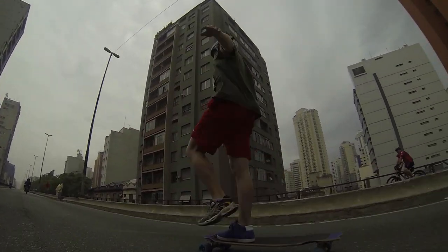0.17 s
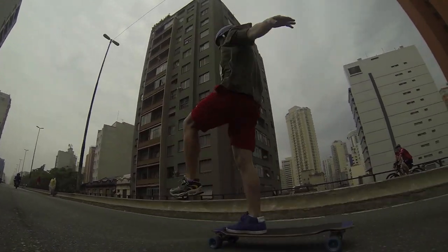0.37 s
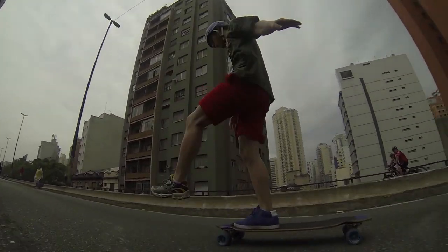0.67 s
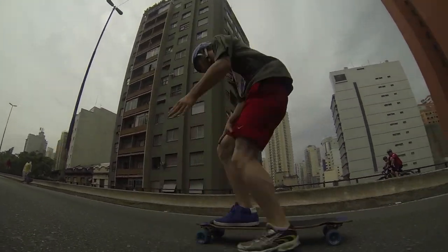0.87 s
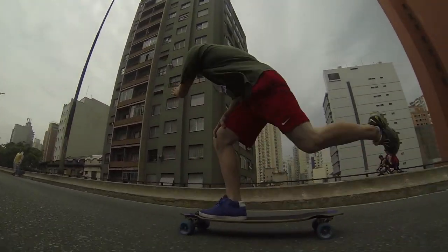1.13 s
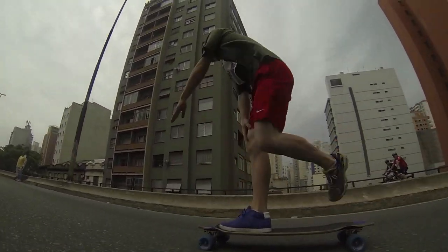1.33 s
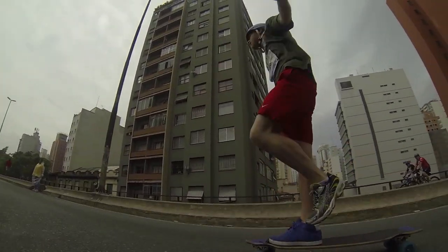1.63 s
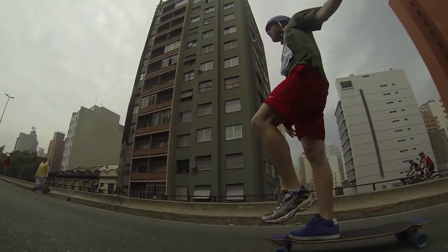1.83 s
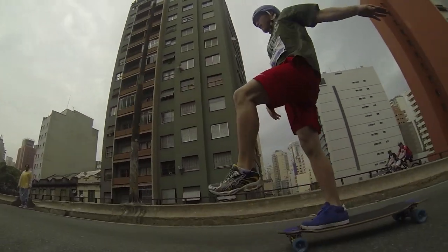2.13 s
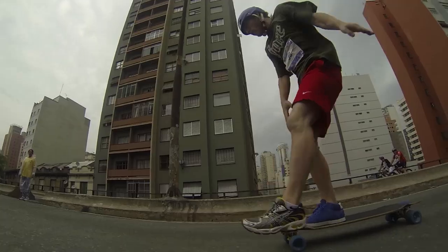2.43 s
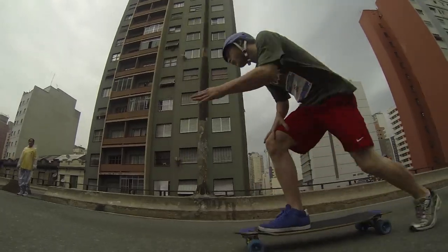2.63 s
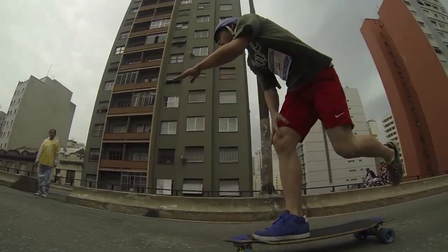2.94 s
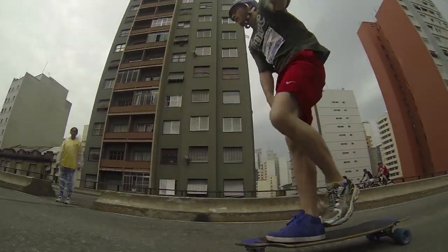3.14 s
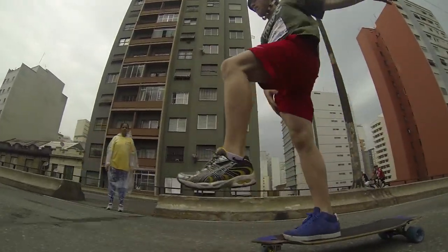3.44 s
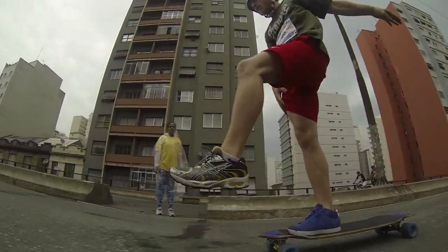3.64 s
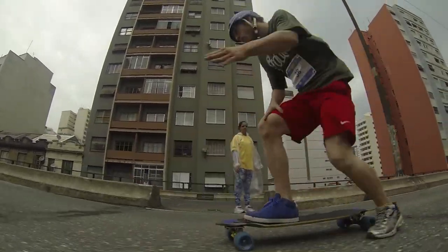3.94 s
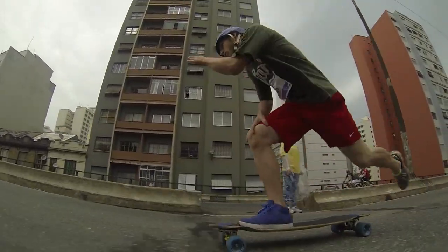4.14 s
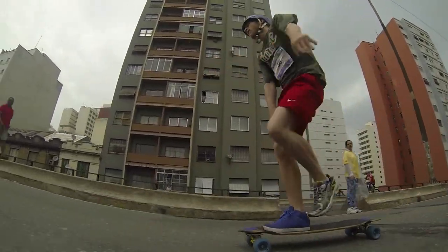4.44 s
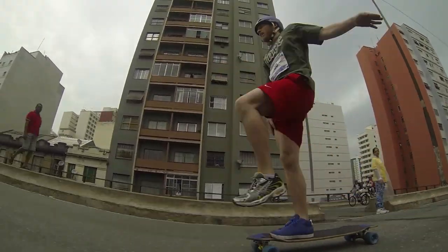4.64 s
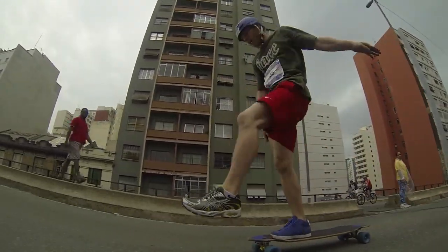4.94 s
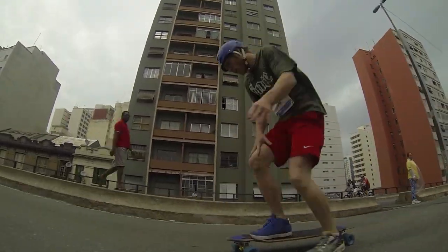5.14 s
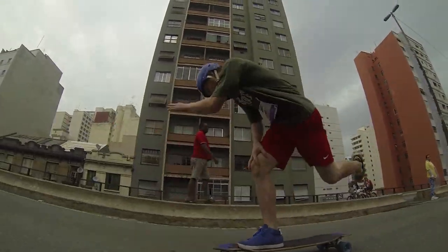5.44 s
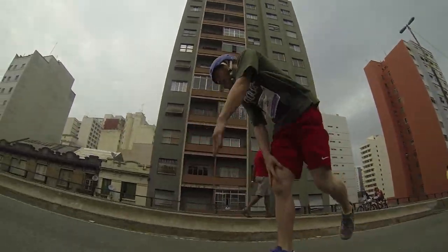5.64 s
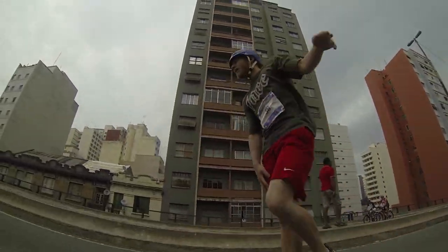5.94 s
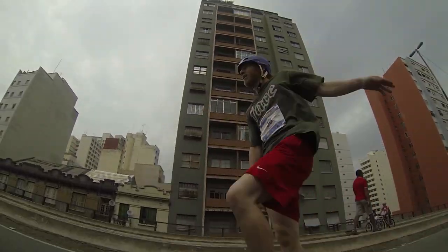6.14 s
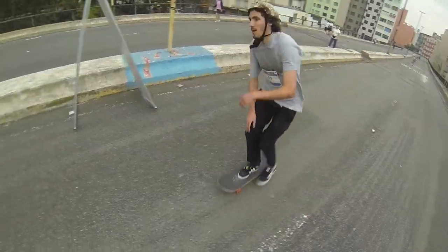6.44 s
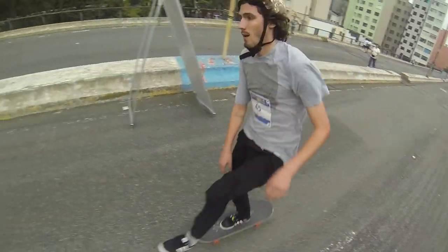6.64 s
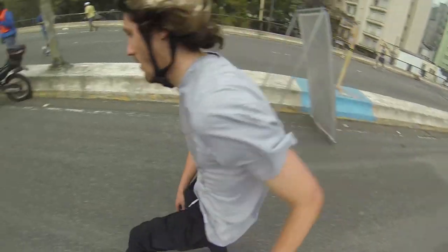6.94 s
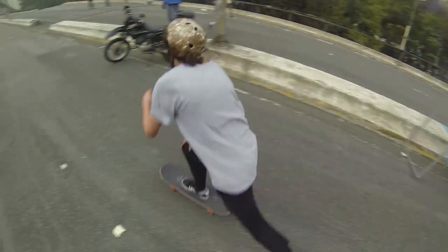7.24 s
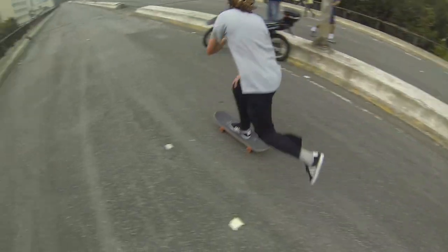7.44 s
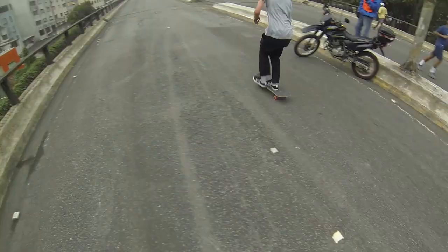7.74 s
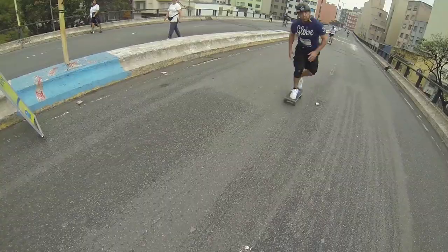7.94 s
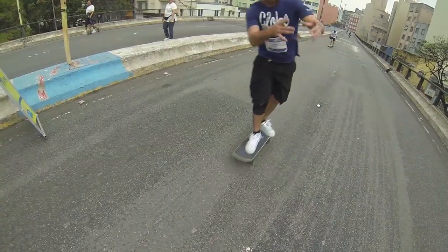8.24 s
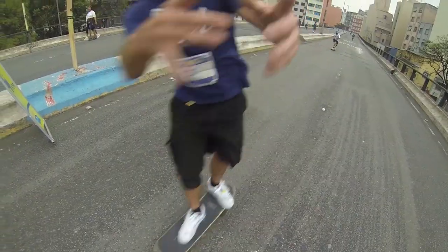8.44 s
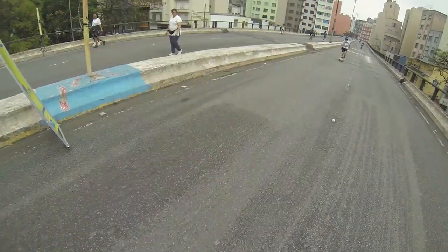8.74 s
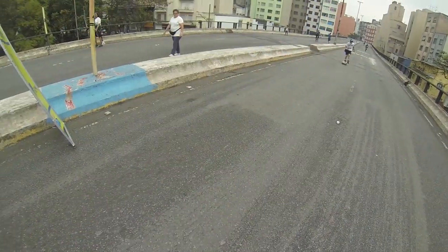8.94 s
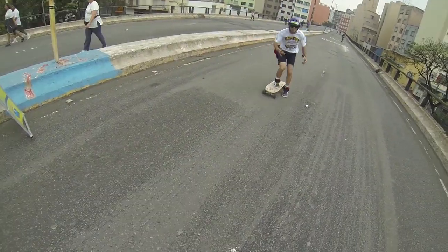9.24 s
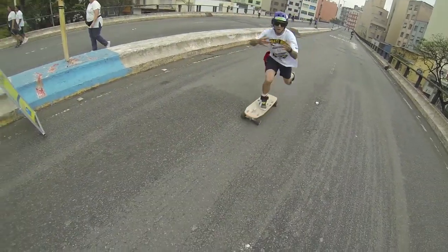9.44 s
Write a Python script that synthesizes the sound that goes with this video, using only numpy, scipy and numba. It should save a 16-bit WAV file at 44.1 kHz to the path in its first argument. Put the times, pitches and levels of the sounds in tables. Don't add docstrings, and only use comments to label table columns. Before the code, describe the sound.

A longboard rumbles over coarse asphalt with heavy low wind thumps and pole shake, then other boards clatter past a roadside microphone in fluttering gusts.

```python
import sys
import numpy as np
from scipy import signal
from scipy.fft import rfft, irfft
from scipy.io import wavfile
from scipy.ndimage import uniform_filter1d
from numba import njit

SR = 44100
rng = np.random.default_rng(int(sys.argv[2]) if len(sys.argv) > 2 else 0)


def file_out(sig):
    cols = np.atleast_2d(sig).T
    lim = np.clip(cols, -1, 1)
    pcm = np.round(lim * 32767).astype(np.int16)
    wavfile.write(sys.argv[1], SR, pcm)


def volts_from_decibels(level):
    exponent = np.asarray(level, float) / 20
    return 10 ** exponent


N = 423345
TIME = np.arange(N) / SR
STOP_S = 6.52

# (time [s], level [dB])
WIND_THUMPS = [(0.0, -21), (0.16, -14), (0.21, -23), (0.29, -15.5), (1.55, -20), (1.95, -15.5),
               (2.75, -15.5), (2.83, -24), (3.2, -21), (3.69, -21), (4.0, -21), (4.3, -21.5), (4.8, -20),
               (5.03, -17.5), (6.3, -16.5), (6.6, -21.5), (6.8, -16.5), (7.0, -24.5), (7.12, -14.5),
               (7.25, -23.5), (7.46, -17.5), (7.55, -18), (7.7, -19.5), (7.82, -25.5), (7.94, -23),
               (7.97, -17), (8.08, -27), (8.21, -18.5), (8.26, -28), (8.34, -20), (8.4, -26), (8.46, -25),
               (8.55, -29), (8.7, -25), (8.81, -24), (8.9, -27), (9.05, -26.5), (9.19, -24), (9.28, -27),
               (9.36, -27.5), (9.45, -26.5), (9.52, -25.5), (9.6, -18)]
# (frequency [Hz], level [dB per Hz])
RIDING_GUST = [(12, -10.5), (22, -3), (38, -6), (50, -11), (62, -12), (85, -10), (130, -26.5), (160, -36),
               (260, -45.5), (500, -74), (2000, -110)]
# (frequency [Hz], level [dB per Hz])
STILL_GUST = [(12, 1), (20, 3.5), (30, -4), (52, -8), (65, -18), (90, -16), (130, -37), (260, -46.5),
              (500, -64), (2000, -110)]
# (time [s], peak level [dB])
MOUNT_BUZZES = [(0.09, -39.5), (0.3, -40.5), (0.65, -34), (1.04, -38.5), (1.3, -42), (1.65, -41),
                (1.84, -38.5), (2.13, -46), (2.55, -32), (2.35, -36.5), (2.75, -44), (3.1, -50), (3.5, -40),
                (3.75, -41.5), (4.05, -42), (4.33, -39.5), (4.55, -40), (4.85, -41.5), (5.05, -38),
                (5.3, -40), (5.5, -37), (5.75, -38.5), (5.95, -38), (6.24, -38.5), (6.56, -46), (6.82, -46),
                (6.98, -45), (7.15, -46.5), (7.45, -47), (7.7, -44.5), (8.1, -47), (8.73, -51.5),
                (9.55, -50)]
BUZZ_RISE_DB_S, BUZZ_FALL_DB_S, BUZZ_REST_DB = 114, 73.5, -35

# (time [s], pitch [Hz], level [dB])
SWAY = [(0.04, 54.05, -20.5), (0.36, 52.97, -20.5), (0.58, 62.64, -18), (1.17, 66.86, -15),
        (2.15, 66.55, -18.5), (2.33, 60.4, -18), (2.48, 67.04, -23.5), (2.74, 62.05, -14.5),
        (3.03, 72.18, -16), (3.6, 69.9, -15.5), (4.1, 75.68, -22), (4.2, 80.6, -17.5), (4.32, 71.14, -21.5),
        (4.68, 68.76, -13.5), (4.8, 77.4, -19), (4.95, 65.7, -16), (5.15, 59.9, -17.5), (5.32, 66, -19),
        (5.45, 76.14, -17.5), (5.58, 65.57, -20.5), (5.95, 62.06, -21), (6.3, 68, -21), (6.6, 54, -25.5),
        (7.67, 54.04, -22), (8.0, 52.4, -32.5)]
# (time [s], depth [dB])
CHOKES = [(0.12, 19), (0.42, 9.5), (0.64, 13.5), (0.77, 7), (1.001, 11.5), (1.38, 6), (1.62, 6), (1.8, 5),
          (2.0, 0), (2.681, 12), (2.98, 6.5), (2.23, 15.5), (3.478, 13.5), (3.74, 15.5), (3.86, 10.5),
          (4.22, 4), (5.6, 11.5), (5.8, 6), (6.15, 13.5), (4.58, 10), (5.03, 13.5), (5.23, 1.5), (6.54, 5),
          (6.71, 8), (6.92, 3.5), (7.12, -6), (7.31, 5), (7.5, 7), (7.86, 7)]
CHOKE_DB_S, LET_GO_DB_S = 155.5, 123
# (time [s], pitch [Hz], peak level [dB])
FLEX_BUMPS = [(0.07, 98.6, -28), (0.22, 101, -24.5), (0.34, 97.5, -39), (0.5, 105, -37), (0.57, 105.4, -28),
              (0.75, 103.3, -29), (1.0, 96.8, -28), (1.15, 100.2, -30), (1.3, 108.8, -31),
              (1.418, 100.6, -20.5), (1.65, 105.2, -21.5), (1.87, 118.8, -25), (2.139, 88.6, -27.5),
              (2.309, 115.7, -25), (2.531, 108.4, -20), (2.66, 95.4, -26), (2.77, 101, -22.5),
              (2.98, 110.2, -25.5), (3.15, 108.2, -23.5), (3.3, 107.6, -27.5), (3.638, 104, -20),
              (3.902, 103.5, -18.5), (4.05, 111.3, -16.5), (4.22, 111, -22), (4.498, 105.6, -24.5),
              (4.81, 98.6, -20), (5.18, 100.8, -19), (5.339, 104.7, -20.5), (5.629, 99.3, -17),
              (5.941, 94.8, -28.5), (6.29, 102.9, -23), (6.68, 99.7, -34), (7.3, 100, -37),
              (7.45, 97.9, -34), (7.69, 107.5, -33), (8.0, 94.9, -34), (9.05, 99.7, -43.5),
              (9.44, 102.4, -32)]
FLEX_RISE_DB_S, FLEX_FALL_DB_S, FLEX_REST_DB = 113.5, 95, -16.5

# (time [s], roll level [dB])
NEAR_ROLL = [(0.04, -39), (0.3, -39.5), (0.58, -39.5), (0.75, -41.5), (1.05, -39.5), (1.43, -40),
             (1.85, -36), (2.23, -40.5), (2.74, -41.5), (3.53, -42.5), (3.89, -42), (4.3, -45),
             (4.67, -41.5), (5.0, -43), (5.24, -43), (5.5, -42.5), (6.05, -42.5), (6.25, -45.5)]
# (time [s], depth [dB], pull time [s])
DUCKS = [(0.34, 4, 0.023), (0.611, 7, 0.013), (0.9, 8.5, 0.11), (1.01, 5.5, 0.057), (1.25, 8, 0.38),
         (1.52, 9.5, 0.063), (1.75, 10.5, 0.26), (1.87, 15.5, 0.0063), (2.45, 6, 0.26), (2.63, 8.5, 0.19),
         (2.83, 11, 0.099), (2.93, 7.5, .1), (3.09, 5, 0.079), (3.2, 7.5, 0.067), (3.38, 4.5, 0.075),
         (3.7, 4, 0.08), (3.94, 7, 0.027), (4.56, 2.5, 0.24), (4.69, 7, 0.016), (4.82, 4.5, 0.3),
         (4.875, 3.5, .02), (5.19, 2, 0.1), (5.32, 5, 0.03), (5.7, 1, .1), (6.08, 1, 0.034),
         (6.41, 7.5, 0.19), (6.5, 8, 0.033)]
RECOVER_DB_S = 48
GRIT_UNDER_DB, DRUM_DB, DRUM_SHARE = -5, -47.5, 0.48
COMING_DB, COMING_DB_S = -43.5, 11.5
# (time [s], roll [dB], deck drum [dB], deck ring [Hz])
PASSING_BOARDS = [(6.53, -46, -46, 463), (6.6, -51, -38, 474), (6.7, -50, -39.5, 515), (6.8, -61, -41, 514),
                  (6.9, -56, -40.5, 570), (7.03, -55, -48, 606), (7.12, -48, -41.5, 564),
                  (7.22, -43, -39.5, 560), (7.3, -55, -42, 578), (7.7, -52, -49.5, 656),
                  (8.13, -47, -52, 760), (8.3, -49, -54.5, 585), (8.42, -46, -46, 537),
                  (8.5, -43.5, -41.5, 643), (8.57, -47.5, -41.5, 600), (8.64, -46, -41.5, 620),
                  (8.72, -50, -49, 333), (8.8, -49.5, -58, 420), (9.03, -51, -56, 470),
                  (9.41, -45.5, -67, 504), (9.55, -49, -51.5, 624)]
COME_DB_S, GO_DB_S, STREET_ROLL_DB, STREET_DRUM_DB = 61, 69, -53.5, -76
# (time [s], level [dB])
FAR_GRIT = [(6.53, -55.5), (6.58, -60), (6.62, -65), (6.7, -66), (6.9, -71), (7.05, -65), (7.22, -60),
            (7.35, -69), (7.75, -59), (7.98, -64), (8.14, -58), (8.25, -65), (8.55, -63), (8.62, -66),
            (8.69, -58.5), (8.86, -64), (9.2, -82.5), (9.36, -62), (9.49, -61), (9.6, -61)]
# (frequency [Hz], width [Hz], level [dB])
CASE_LOW = [(1466, 283, 2), (1432, 54, 0.5), (1818, 115, -4.5), (1662, 110, -3.5), (1335, 380, -7.5)]
# (frequency [Hz], width [Hz], level [dB])
CASE_HIGH = [(2262, 460, 3), (3146, 640, 2), (4020, 910, -5.5), (4610, 140, -10.5), (4970, 180, -12.5),
             (5255, 1020, -8), (6665, 740, -12), (7620, 1100, -21), (9400, 1900, -23), (11100, 2600, -31)]
# (frequency [Hz], width [Hz], level [dB])
CASE_THIN = [(2290, 31, -2.5), (3130, 39, -1), (3960, 70, -1), (4720, 59, -1.5), (6740, 63, -7.5)]
# (frequency [Hz], width [Hz], level [dB])
FAR_LOW = [(1485, 240, 3.5), (1320, 220, -2.5), (1840, 290, -11), (1040, 350, -16)]
# (frequency [Hz], width [Hz], level [dB])
FAR_HIGH = [(2220, 500, 6.5), (2520, 160, 4), (3140, 700, 0.5), (3850, 350, -8), (4700, 360, -14)]
# (frequency [Hz], width [Hz], level [dB])
DECK = [(289, 277, 3.5), (459, 71, 0), (704, 340, -6.5), (803, 620, -7.5)]
BIGGEST_STONE = 3

# (frequency [Hz], level [dB per Hz])
HISS = [(200, 1), (1500, -13), (3000, -16.5), (4400, -24.5), (7000, -25.5), (8100, -34), (10300, -30),
        (12000, -37.5), (13000, -44.5), (15000, -46.5)]
# (frequency [Hz], width [Hz], level [dB])
HISS_PEAKS = [(5110, 360, -16), (8830, 840, -25.5), (9740, 280, -27)]
# (frequency [Hz], width [Hz], level [dB])
WHINES = [(9350, 14, -22), (9411, 14, -21), (9830, 12, -22)]

# (time [s], case ring [dB], sharp crack [dB], deck [dB], deck pitch [Hz])
KNOCKS = [(0.435, -50, -66, -40, 340), (0.555, -50, -66, -39, 358), (0.6145, -48, -66, -32.5, 327),
          (0.619, -52, -66, -38.5, 480), (0.628, -52, -57, -43, 366), (2.4159, -47, -55, -48, 333),
          (6.5693, -33.5, -60, -25.5, 490), (6.586, -42, -70, -33, 486), (6.6077, -49, -71, -30.5, 467),
          (6.652, -40, -68, -30, 480), (6.662, -45, -72, -40, 800), (6.691, -60, -68, -36, 543),
          (6.708, -53, -72, -45, 484), (6.749, -38, -65.5, -36, 525), (6.778, -42, -66, -36, 510),
          (6.794, -48, -70, -45, 480), (6.8144, -19, -55, -24.5, 469.3), (6.826, -50, -70, -32, 444),
          (6.876, -52, -70, -35, 554), (6.908, -47, -68, -43, 608.7), (7.035, -35, -64, -46, 644),
          (7.055, -46, -66, -40, 640), (7.231, -47, -71, -45, 448), (7.259, -47, -65, -41, 520),
          (7.0971, -32, -58, -47, 297.8), (7.117, -40, -57, -43, 302), (8.335, -35, -61, -44, 814),
          (8.403, -37, -62, -40, 506), (8.4508, -30, -66, -39, 337), (8.5058, -29, -61, -41, 442),
          (8.5764, -25, -62, -37, 425), (8.587, -27, -69, -42, 650), (8.656, -45.5, -62, -44, 621),
          (8.689, -45, -64, -58, 495), (8.706, -49, -60, -52, 518), (9.0164, -53, -63, -46, 347)]
# (time [s], case ring [dB], sharp
# crack [dB])
TICKS = [(0.938, -42, -47.5), (4.672, -36, -49), (4.851, -43, -54.5), (5.234, -31, -49.5),
         (6.8165, -27, -50.5), (7.462, -44, -62), (7.487, -45, -64), (8.322, -49, -62), (7.3867, -39, -55),
         (7.771, -33, -66), (7.8152, -37, -66), (7.837, -30, -68), (7.952, -40, -70), (8.05, -33, -64),
         (8.0907, -34, -69), (8.1324, -40, -60), (8.177, -34, -72), (8.2, -37, -69), (8.288, -42, -67.5),
         (9.075, -31, -70), (9.1686, -51, -72), (9.291, -53, -74), (9.3671, -36, -68)]
TICK_DECK_DB, TICK_DECK_HZ = -50.5, 320
MOUNT_KNEE_DB, MOUNT_SLOPE = -24.5, 1.5
# (frequency [Hz], width [Hz], level [dB])
CRACK = [(2230, 500, 0.5), (3250, 840, 0), (4050, 530, -3.5), (4900, 590, -6.5), (6300, 1000, -13),
         (7840, 1200, -17.5)]
# (time [s], pole level [dB], mount level [dB])
THUMPS = [
    (6.8131, -18, -22),
    (8.728, -30.5, -45),
    (8.781, -44, -49),
]

# (time [s], peak level [dB])
JOLTS = [(0.591, -41), (1.116, -30.5), (1.25, -32.5), (1.44, -30), (1.633, -37.5), (1.761, -38),
         (1.839, -28.5), (2.12, -32.5), (2.225, -33), (2.5, -32), (2.6, -43), (2.729, -30), (3.03, -27),
         (3.317, -33.5), (3.504, -40), (3.665, -36), (4.12, -35), (4.26, -39.5), (4.615, -35), (4.822, -41),
         (4.961, -42), (5.168, -39), (5.686, -37), (5.92, -49), (6.178, -50), (6.937, -47.5),
         (7.374, -36.5), (8.075, -42), (9.02, -48), (9.28, -42)]
# (frequency [Hz], level [dB per Hz])
JOLT_RATTLE = [(90, -38.5), (125, 8.5), (150, 2.0), (240, -8.0), (380, -24.0), (900, -63.0)]


def level(x, db):
    return x * volts_from_decibels(db) / np.sqrt(np.mean(x ** 2))


def curves(table):
    s, *columns = np.transpose(table)
    return [np.interp(TIME, s, column) for column in columns]


def swells(times, peaks_db, rise_db_s, fall_db_s, rest_db):
    t = np.arange(0, N / SR + .01, .002)
    late = t - np.array(times)[:, None]
    slope = np.where(late < 0, -np.reshape(rise_db_s, (-1, 1)), fall_db_s)
    db = np.max(np.array(peaks_db)[:, None] - slope * late, axis=0)
    return np.maximum(np.interp(TIME, t, db), rest_db)


def colour(x, peaks=(), slope=()):
    size = 2 ** 14
    hz = np.arange(size // 2 + 1) * SR / size + 1
    power = 1e-14 + sum(volts_from_decibels(2 * db) / (1 + (2 * (hz - f) / w) ** 2) ** 2 for f, w, db in peaks)
    if len(slope):
        slope_hz, slope_db = np.transpose(slope)
        power = power + volts_from_decibels(2 * np.interp(np.log(hz), np.log(slope_hz), slope_db))
    cepstrum = irfft(np.log(power) / 2, size)
    cepstrum[1:size // 2] *= 2
    cepstrum[size // 2 + 1:] = 0
    response = irfft(np.exp(rfft(cepstrum)), size)
    return signal.fftconvolve(x, response)[:N]


def walk(rate):
    k = int(SR / rate)
    held = np.repeat(rng.standard_normal(N // k + 1), k)
    x = uniform_filter1d(uniform_filter1d(held, k), k)[:N]
    return x / x.std()


def steady(x, span_s, share):
    k = int(span_s * SR)
    slow = uniform_filter1d(uniform_filter1d(x ** 2, k), k) + 1e-12
    return level(x * slow ** (-np.clip(share, 0, 1) / 2), 0)


def ringing(t, hz, decay_s):
    return np.sin(2 * np.pi * hz * t) * np.exp(-t / decay_s)


def wind():
    thump_db = curves(WIND_THUMPS)[0] - 2.5
    buzz_rest_db = curves(SWAY)[1] + BUZZ_REST_DB
    buzz_db = swells(*np.transpose(MOUNT_BUZZES), BUZZ_RISE_DB_S, BUZZ_FALL_DB_S, buzz_rest_db)
    stop = np.clip((TIME - 6.3) / 0.12, 0, 1)
    air = rng.standard_normal(N)
    riding = steady(colour(air, slope=RIDING_GUST), .12, .7) * volts_from_decibels(-1.5)
    flutter_db = 2.43 + 1.5 * walk(8.5)
    standing = steady(colour(air, slope=STILL_GUST), 0.08, 0.91) * volts_from_decibels(flutter_db)
    thump = riding * (1 - stop) + standing * stop
    buzz_riding = level(colour(rng.standard_normal(N), [(185.1, 14.0, 0.0055)]), 0)
    buzz_still = level(colour(rng.standard_normal(N), [(203.4, 16, 0.0046)]), 0)
    buzz = steady(buzz_riding * (1 - stop) + buzz_still * stop, 0.073, 0.83)
    return thump * volts_from_decibels(thump_db) + buzz * volts_from_decibels(buzz_db - 1.5)


def bending(hz, db, wobble_hz, shake_db, shake_rate):
    phase = 2 * np.pi * np.cumsum(hz + wobble_hz * walk(shake_rate)) / SR - np.pi / 2
    return np.sqrt(2) * np.sin(phase) * volts_from_decibels(db + shake_db * walk(shake_rate))


def pole():
    hz, shake_db = curves(SWAY)
    choke_db = swells(*np.transpose(CHOKES), CHOKE_DB_S, LET_GO_DB_S, 0)
    sway = bending(hz, shake_db - choke_db, wobble_hz=1.497, shake_db=2.0, shake_rate=14)
    s, _, peak_db = np.transpose(FLEX_BUMPS)
    flex_db = swells(s, peak_db, FLEX_RISE_DB_S, FLEX_FALL_DB_S, shake_db + FLEX_REST_DB)
    flex = bending(curves(FLEX_BUMPS)[0], flex_db, wobble_hz=2.45, shake_db=3.5, shake_rate=16)
    held_up = np.clip((8.1 - TIME) / 0.13, 0, 1)
    return sway * held_up + flex


def stones(density, scatter_db):
    hit = rng.random(N) < density / SR
    size_db = scatter_db * np.minimum(rng.exponential(size=N), BIGGEST_STONE)
    return rng.standard_normal(N) + 2.47 * hit * rng.standard_normal(N) * volts_from_decibels(size_db)


@njit
def ring_at(x, hz, width):
    y, band, low = np.empty(len(x)), 0., 0.
    for i in range(len(x)):
        g, k = np.tan(np.pi * hz[i] / SR), width / hz[i]
        v = (band + g * (x[i] - low)) / (1 + g * (g + k))
        band, low, y[i] = 2 * v - band, low + 2 * g * v, k * v
    return y


def rolling_levels():
    s, depth_db, pull_s = np.transpose(DUCKS)
    duck_db = swells(s, depth_db, depth_db / np.maximum(pull_s, .005), RECOVER_DB_S, 0)
    near_db = curves(NEAR_ROLL)[0] - duck_db
    coming_db = COMING_DB - COMING_DB_S * (STOP_S - TIME)
    near_drum_db = np.maximum(DRUM_DB + DRUM_SHARE * (near_db + 40.0), coming_db)
    near = near_db, near_db + GRIT_UNDER_DB, near_drum_db
    s, roll_db, drum_db, _ = np.transpose(PASSING_BOARDS)
    far_roll_db = swells(s, roll_db, COME_DB_S, GO_DB_S, STREET_ROLL_DB)
    far_drum_db = swells(s, drum_db, COME_DB_S, GO_DB_S, STREET_DRUM_DB)
    far = far_roll_db, curves(FAR_GRIT)[0], far_drum_db
    return np.where(np.arange(N) < STOP_S * SR, near, far)


def wheels():
    roll_db, grit_db, drum_db = rolling_levels()
    texture_db = walk(18) + walk(45)
    road = stones(density=900, scatter_db=2.5)
    riding = np.arange(N) < STOP_S * SR

    roll = np.where(riding, level(colour(road, CASE_LOW), 0), level(colour(road, FAR_LOW), 0))
    roll = steady(roll, 0.013, 0.17) * volts_from_decibels(roll_db + 0.67 * texture_db + 0.14 * walk(25))

    gravel = 0.47 * road + stones(density=900, scatter_db=3.5)
    near_grit = level(colour(gravel, CASE_HIGH + CASE_THIN), 0)
    far_grit = level(colour(road, FAR_HIGH), 0)
    grit = np.where(riding, near_grit, far_grit) * volts_from_decibels(grit_db + 0.41 * texture_db + 0.6 * walk(35))

    deck = level(colour(stones(density=100, scatter_db=1.0), DECK), 0)
    hollow = steady(ring_at(deck, curves(PASSING_BOARDS)[-1], 170.0), 0.022, 0.7)
    deck = np.where(riding, deck, volts_from_decibels(1.5) * (0.68 * hollow + 0.42 * deck))
    drum = deck * volts_from_decibels(drum_db + 0.84 * texture_db + 0.5 * walk(22))
    return roll + grit + drum


def camera():
    hiss = level(colour(rng.standard_normal(N), HISS_PEAKS + WHINES, HISS), -53)
    return hiss * volts_from_decibels(1.4 * walk(8) + 0.62 * walk(29))


def knocks():
    cracks, out = np.zeros((2, N)), np.zeros(N)
    t = np.arange(int(.2 * SR)) / SR
    ticks = [(*row, TICK_DECK_DB, TICK_DECK_HZ) for row in TICKS]
    for s, case_db, crack_db, deck_db, hz in KNOCKS + ticks:
        start = int((s - .0015) * SR)
        at = slice(start, start + len(t))
        rise = 1 - np.exp(-t / 0.00065)
        chatter = 0.32 * rng.standard_normal(len(t)) * rise * np.exp(-t / 0.0033)
        burst = 0.5 * (t == 0) + chatter
        cracks[:, at] += volts_from_decibels(np.array([[case_db + 24.0], [crack_db + 34.0]])) * burst
        deck = ringing(t, hz, .009) + .6 * ringing(t, 1.52 * hz, .004)
        deck = deck + 0.32 * ringing(t, 2.15 * hz, 0.0012)
        mount_db = -28.5 + MOUNT_SLOPE * (deck_db - MOUNT_KNEE_DB)
        mount = volts_from_decibels(mount_db - 2.5) * ringing(t, 197, 0.023)
        out[at] -= rise * (volts_from_decibels(deck_db + 5.5) * deck + mount)
    for s, pole_db, mount_db in THUMPS:
        at = slice(int(s * SR), int(s * SR) + len(t))
        out[at] += volts_from_decibels(pole_db) * ringing(t, 104, 0.038) + volts_from_decibels(mount_db) * ringing(t, 200, 0.028)
    return out + colour(cracks[0], CASE_LOW) + colour(cracks[1], CRACK)


def jolts():
    size = np.zeros(N + SR)
    t = np.arange(int(.15 * SR)) / SR
    for s, db in JOLTS:
        start = int(s * SR)
        size[start:start + len(t)] += volts_from_decibels(db + 10.0) * t / 0.028 * np.exp(-t / 0.018)
    rattle = colour(rng.standard_normal(N), slope=JOLT_RATTLE)
    return steady(rattle, 0.041, 1.0) * size[:N]


def scene():
    return (wind() + pole() + wheels() + camera() + knocks() + jolts())[None]


@njit
def limiter(x, top, attack, release):
    y, envelope = np.empty(len(x)), 0.
    for i in range(len(x)):
        size = abs(x[i])
        envelope += (size - envelope) * (attack if size > envelope else release)
        y[i] = x[i] * min(1., top / (envelope + 1e-9))
    return y


def band_limit(x):
    return signal.sosfilt(signal.butter(12, 15030, fs=SR, output="sos"), x)


def record(dry):
    bent = dry[0] + 0.24 * dry[0] ** 2
    bent = signal.sosfilt(signal.butter(1, 8, "high", fs=SR, output="sos"), bent)
    held = limiter(bent, .52, 0.11, 0.00026)
    return band_limit(held[None])


dry = scene()
out = record(dry)
file_out(out)
```